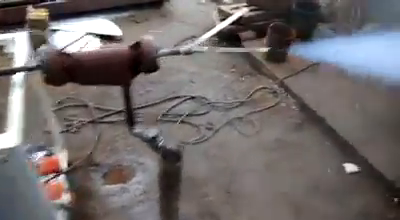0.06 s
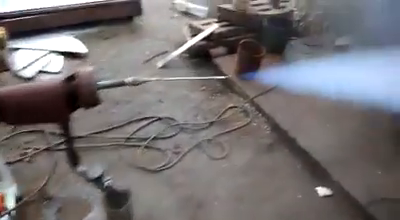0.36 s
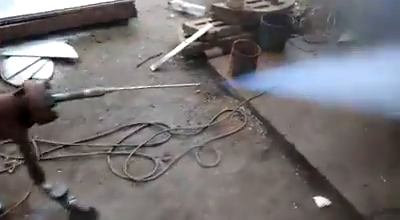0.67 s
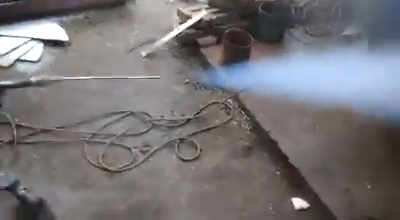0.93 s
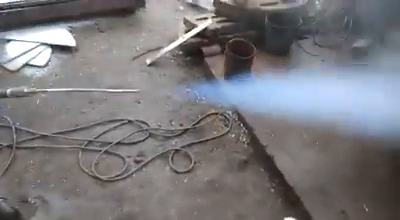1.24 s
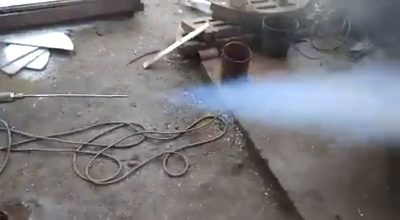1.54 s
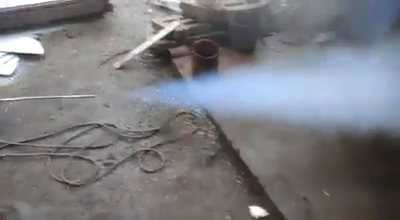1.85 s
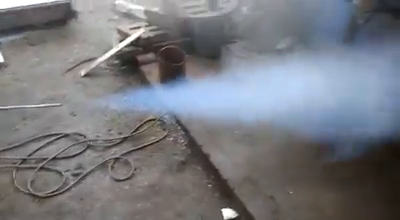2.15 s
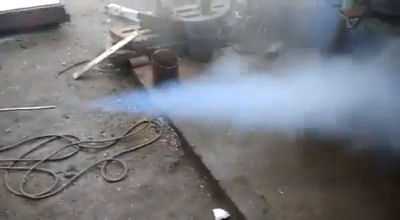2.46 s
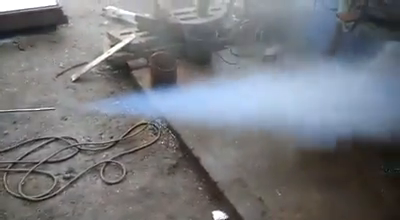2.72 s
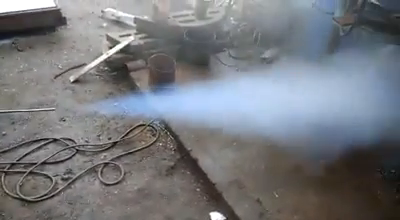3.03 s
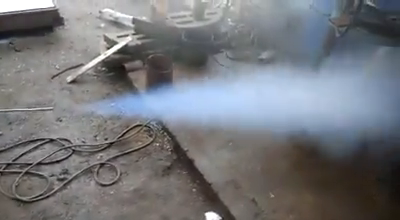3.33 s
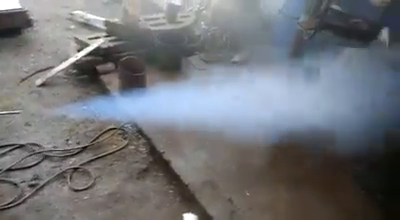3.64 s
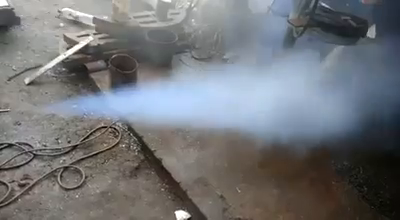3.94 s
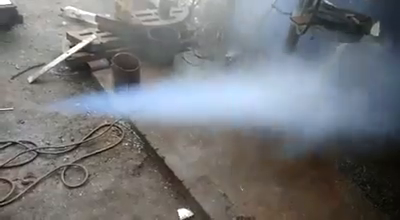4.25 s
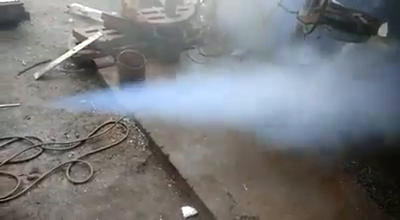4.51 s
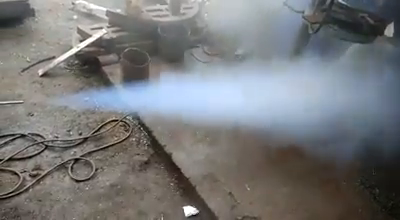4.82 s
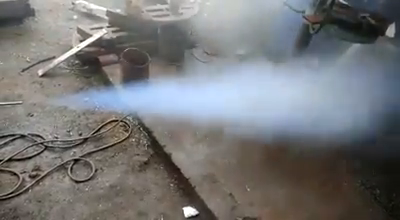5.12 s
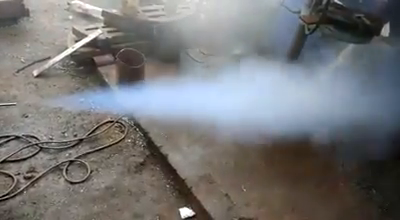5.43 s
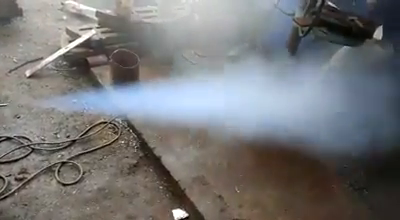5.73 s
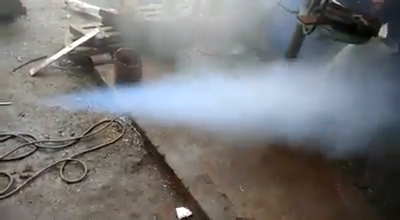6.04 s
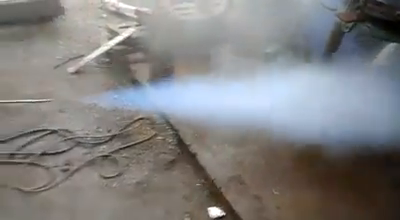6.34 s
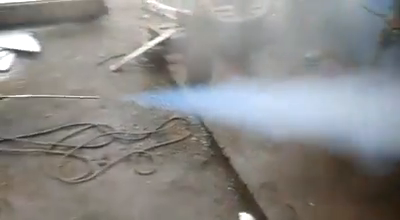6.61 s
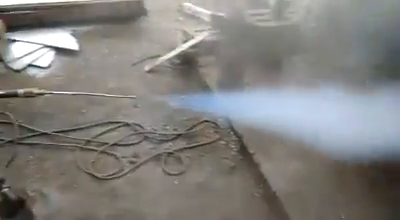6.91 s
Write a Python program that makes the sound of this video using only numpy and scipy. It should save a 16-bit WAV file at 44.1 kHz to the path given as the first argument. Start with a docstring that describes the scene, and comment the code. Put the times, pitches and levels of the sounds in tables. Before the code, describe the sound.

A steady, high, sharp hiss of steam escapes a small boiler's nozzle, heard close up on a hand-held phone in a workshop. The hiss has a fine sizzle, and beneath it are a bright rush and the plume's quiet roar. The roar grows a little in the first second as the microphone moves along the jet. After that, tone and balance shift only slightly, and the steam never lets up.

```python
"""A piercing, steady hiss: steam blows from a thin pipe on a small boiler, in a hard-walled workshop.
The finest eddies (little swirls) at the nozzle hiss, larger ones along the jet's edge rush, and the
wide plume roars softly over a faint rumble. All of them sound together from the start.
A hand-held phone moves from the boiler along the jet, so loudness, tone and left-right balance shift.
The concrete floor adds a weak reflection of the rush."""
import sys
import numpy as np
from scipy import signal
from scipy.fft import rfft, irfft, next_fast_len
from scipy.io import wavfile
from scipy.ndimage import uniform_filter1d

SR = 44100
rng = np.random.default_rng(int(sys.argv[2]) if len(sys.argv) > 2 else 0)


def write(x):
    x = np.atleast_2d(x).T
    wavfile.write(sys.argv[1], SR, np.round(np.clip(x, -1, 1) * 32767).astype(np.int16))


N = 311787
TIME_S = np.arange(N) / SR
RUSH_HZ, BRIGHT_HZ, HISS_HZ = 2358, 4564, 8455  # where the rush, its bright part and the hiss begin

# How strong each pitch is in the hiss. Columns: pitch_hz, relative_level_db
HISS_TONE = [(8500, -2), (9000, 0), (9800, 1.25), (11300, 1.6), (11800, -0.6), (12500, 1.5), (14000, 1.5),
             (15200, 0.5)]


def nozzle_hiss():
    """A piercing hiss from the nozzle. A slight, very fast sizzle is heard in it."""
    hiss = band_noise(HISS_TONE, HISS_HZ, 16400, bands=4, likeness=0.017, flicker_db=0.5, flicker_hz=14)
    sizzle_db = 0.54 * drift(900)
    # toward the end the phone drifts back to the nozzle, and the hiss grows a little
    return_db = 0.24 * np.maximum(TIME_S - 4.3, 0)
    level_db = settle(-11, -12.5, settle_s=0.35) + return_db
    return place(hiss * undb(sizzle_db), level_db, left_db=settle(2.2, 0.6, settle_s=3.0))


# How strong each pitch is along the jet's edge. Columns: pitch_hz, relative_level_db
EDGE_TONE = [(2350, -11), (2550, -9.8), (3000, -9.5), (3400, -8), (4000, -7.5), (4500, -6), (5050, -6),
             (5750, -6), (6200, -4.5), (7000, -3.1), (7500, -3.5), (8100, -2.5), (8500, -0.5)]
# A low band, a dip and a high band in that tone, which change with the phone's place.
# Columns: time_s, pitch_hz, gain_db
EDGE_LOW_BAND = [(0, 2800, -1), (2.4, 2750, 1), (2.9, 2780, 1.5), (3.7, 2810, 1), (4, 2850, 4),
                 (4.4, 2800, 2.5), (4.75, 2750, 1), (5.5, 2820, 1.5), (6, 2900, 2), (7, 2800, 2.5)]
EDGE_DIP = [(0, 4520, -2.5), (1.5, 4520, -4), (2.3, 4500, -3.5), (3, 4100, -3), (3.8, 4100, -2.5),
            (4.6, 4140, -1.5), (5.1, 4280, -4.5), (5.7, 4140, -5.5), (6.2, 4470, -3.5), (6.8, 4150, -4)]
EDGE_HIGH_BAND = [(1, 5000, -0.8), (4.4, 5000, 1.3), (7, 4950, 0.8)]


def edge_rush():
    """A rush with a bright part above it. The treble flickers in narrow bands."""
    rush = band_noise(EDGE_TONE, RUSH_HZ, BRIGHT_HZ,
                      bands=36, likeness=0.29, flicker_db=9, flicker_hz=14)
    bright = band_noise(EDGE_TONE, BRIGHT_HZ, HISS_HZ,
                        bands=52, likeness=0.082, flicker_db=12, flicker_hz=9)
    # the sound swells once, and the rush leans left, as the phone comes nearest
    near = nearness()
    rush_db = settle(-30, -27, settle_s=0.69) + 0.7 * near
    bright_db = settle(-21, -19.5, settle_s=4.5) + 0.3 * near
    rush = place(floor_bounce(rush), rush_db, left_db=1.5 + 2.5 * near)
    bright = place(bright, bright_db, left_db=-1)
    sound = shape_band(rush + bright, EDGE_LOW_BAND, width_hz=880)
    sound = shape_band(sound, EDGE_DIP, width_hz=370)
    return shape_band(sound, EDGE_HIGH_BAND, width_hz=340)


def floor_bounce(sound):
    """The floor sends back a weak copy about 3 ms late; the delay drifts as the hand moves."""
    samples = np.arange(N)
    delay_s = 0.0033 * (1 + 0.05 * drift(0.8))
    echo = np.array([np.interp(samples - delay_s * SR, samples, side) for side in sound])
    return sound + 0.2 * echo


# How strong each pitch is in the roar and in the rumble. Columns: pitch_hz, relative_level_db
ROAR_TONE = [(80, -15), (105, -21), (135, -12), (190, -7), (300, -6.5), (450, -6), (800, -6.5),
             (1200, -5.3), (1600, -4.5), (2050, -3.5), (2250, -3.5), (2350, 0)]
RUMBLE_TONE = [(18, -2), (45, -1), (90, 2)]
# One band of the roar that stands out briefly. Columns: time_s, pitch_hz, gain_db
ROAR_ACCENT = [(3.4, 950, -1), (3.8, 950, 0.5), (4.4, 905, 2.5), (4.6, 900, -0.7)]


def plume_roar():
    """Large, slow eddies roar softly, louder once the phone is past the boiler, over a faint rumble."""
    roar = band_noise(ROAR_TONE, 92.6, RUSH_HZ, bands=16, likeness=0.26, flicker_db=1.9, flicker_hz=7)
    rumble = band_noise(RUMBLE_TONE, 16, 90.5, bands=2, likeness=0.05, flicker_db=9, flicker_hz=8)
    ease_off_db = 0.13 * TIME_S
    roar_db = settle(-40, -32.5, settle_s=0.48) + 0.5 * nearness() - ease_off_db
    roar = place(roar, roar_db, left_db=settle(9, -1.8, settle_s=2.7))
    roar = shape_band(roar, ROAR_ACCENT, width_hz=460)
    return roar + place(rumble, level_db=-67, left_db=3.5)


def band_noise(tone, low_hz, high_hz, bands, likeness, flicker_db, flicker_hz):
    """Noise in bands that fade in and out at random."""
    size = next_fast_len(N)
    hz = np.arange(size // 2 + 1) * SR / size
    pitch_hz, level_db = np.transpose(tone)
    tone_db = np.interp(np.log(hz + 1), np.log(pitch_hz), level_db)
    gain = undb(tone_db) * (hz >= low_hz) * (hz < high_hz)
    # left and right are unrelated at likeness 0, equal at 1
    shared, opposed = rfft(rng.standard_normal((2, size)))
    opposed = opposed * np.array([[1], [-1]])
    spectrum = gain * (np.sqrt(1 + likeness) * shared + np.sqrt(1 - likeness) * opposed)
    band_number = np.floor(bands * (hz - low_hz) / (high_hz - low_hz))
    # a band may fade far but swells only a little
    swells_db = [flicker_db * np.minimum(drift(flicker_hz), 0.5) for _ in range(bands)]
    swells = undb(swells_db).astype(np.float32)
    # its neighbours make up part of the loss, so the whole stays steady
    swells /= uniform_filter1d(swells ** 2, size=9, axis=0) ** 0.3
    return sum(irfft(spectrum * (band_number == k), size)[:, :N] * swells[k] for k in range(bands))


def shape_band(sound, track, width_hz):
    """Turn one band of pitches up or down, following rows of time_s, pitch_hz, gain_db."""
    time_s, pitch_hz, gain_db = np.transpose(track)
    centre_hz = np.interp(TIME_S, time_s, pitch_hz)
    gain = undb(np.interp(TIME_S, time_s, gain_db))
    # slide the band down to 0 Hz, keep only that part, then slide it back
    shift = np.exp(2j * np.pi * np.cumsum(centre_hz) / SR)
    low_pass = signal.butter(2, width_hz / 2, fs=SR, output="sos")
    band = 2 * np.real(signal.sosfiltfilt(low_pass, sound / shift) * shift)
    return sound + (gain - 1) * band


def drift(rate_hz):
    """A smooth random wobble of typical size 1, with about rate_hz new values a second."""
    points = rng.standard_normal(4096)
    zigzag = np.interp(TIME_S * rate_hz, np.arange(len(points)), points)
    return unit(uniform_filter1d(zigzag, int(SR / rate_hz / 2)))


def settle(start, end, settle_s):
    """Glide from the value beside the boiler to the value along the jet, fast at first, then slowly."""
    return end + (start - end) * np.exp(-TIME_S / settle_s)


def nearness(nearest_s=3.93, width_s=0.36):
    """1 when the phone is nearest to the jet's edge, 0 well before and after."""
    return np.exp(-((TIME_S - nearest_s) / width_s) ** 2)


def place(sound, level_db, left_db):
    """Set a stereo sound's level, and tilt it so the left gains left_db over the right."""
    return unit(sound) * undb(level_db + np.array([[0.5], [-0.5]]) * left_db)


def undb(db):
    """Turn decibels into a number to multiply by."""
    return 10 ** (np.asarray(db) / 20)


def unit(sound):
    """Scale to an average strength (rms) of 1."""
    return sound / np.sqrt(np.mean(sound ** 2))


def scene():
    """The flow from the boiler flutters slightly, so hiss, rush and roar waver together."""
    flutter_db = 0.29 * drift(17)
    return (nozzle_hiss() + edge_rush() + plume_roar()) * undb(flutter_db)


def record(dry):
    """The phone clips any peak past full scale and cuts the treble above 15400 Hz."""
    low_pass = signal.ellip(12, 0.1, 70, 15400, fs=SR, output="sos")
    return signal.sosfilt(low_pass, np.clip(dry, -1, 1))


dry = scene()
out = record(dry)
write(out)
```